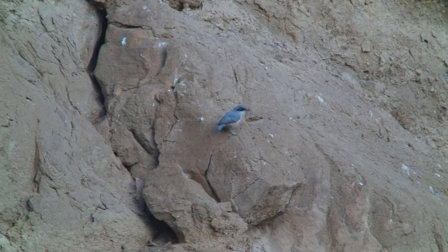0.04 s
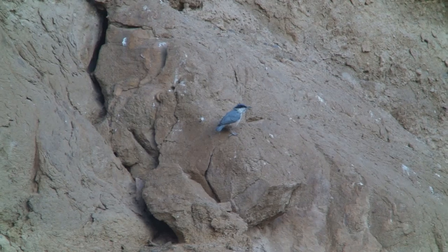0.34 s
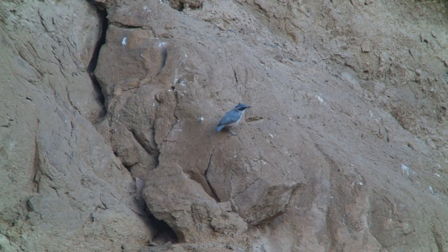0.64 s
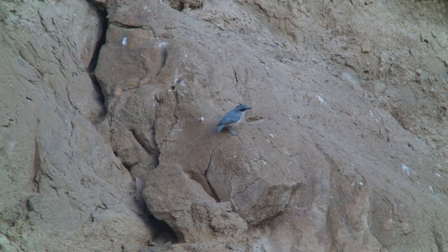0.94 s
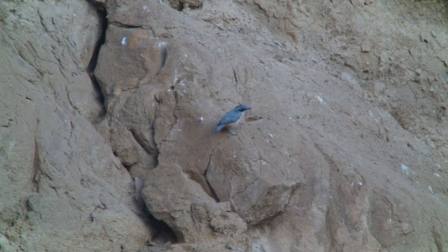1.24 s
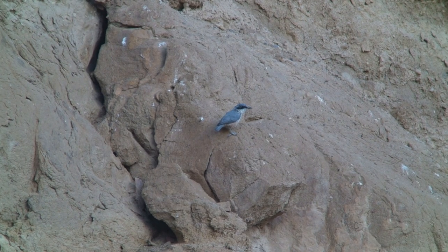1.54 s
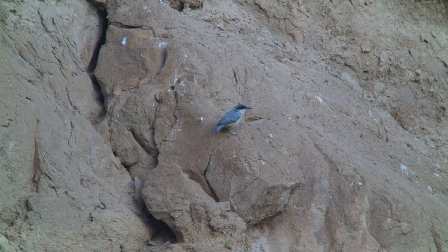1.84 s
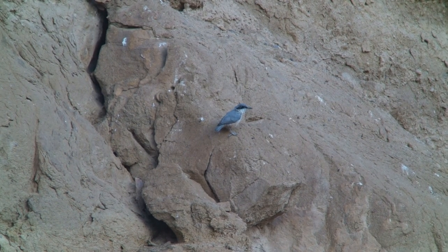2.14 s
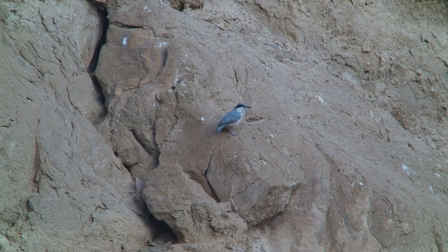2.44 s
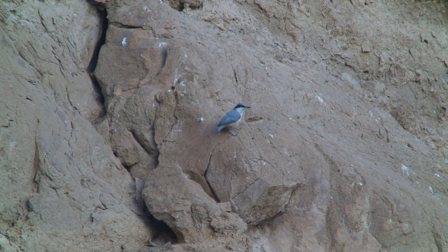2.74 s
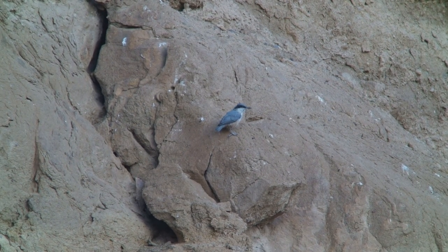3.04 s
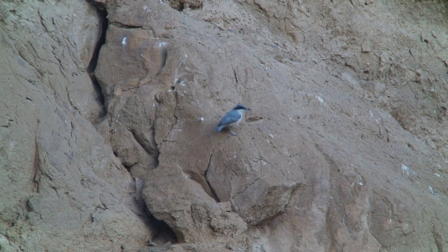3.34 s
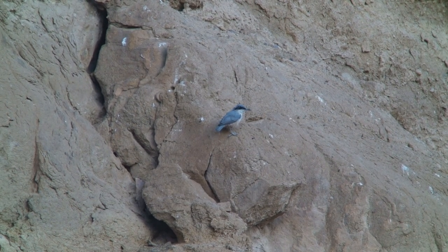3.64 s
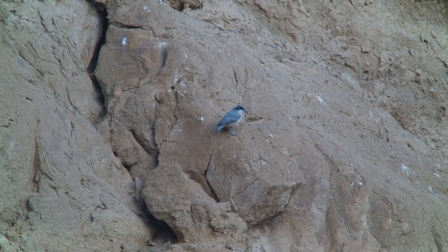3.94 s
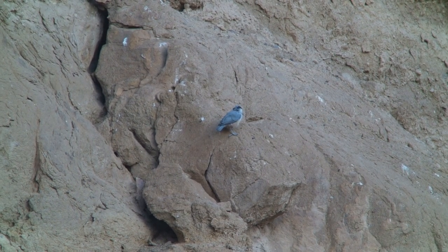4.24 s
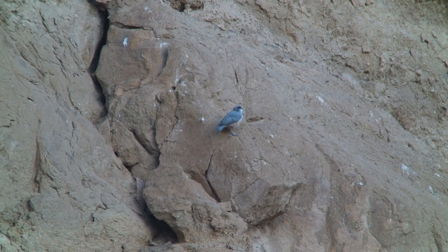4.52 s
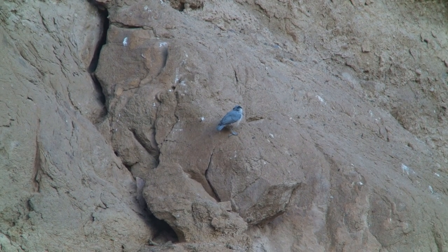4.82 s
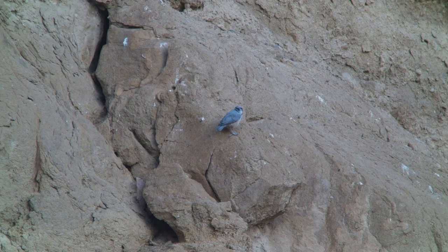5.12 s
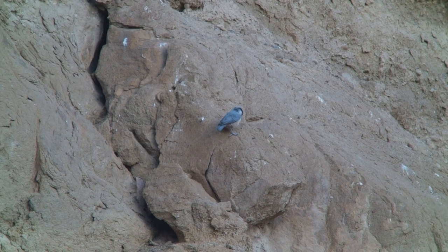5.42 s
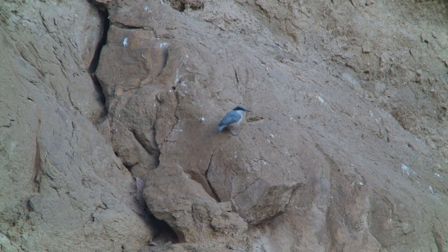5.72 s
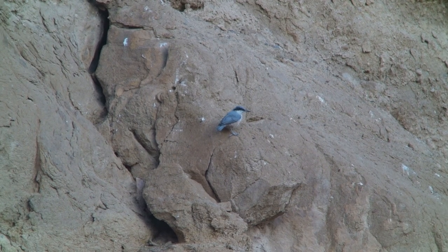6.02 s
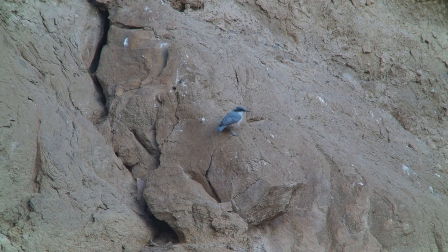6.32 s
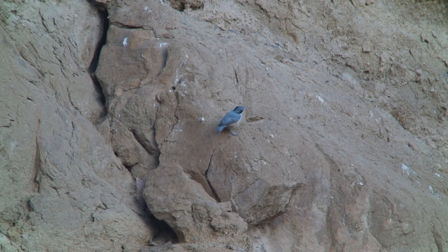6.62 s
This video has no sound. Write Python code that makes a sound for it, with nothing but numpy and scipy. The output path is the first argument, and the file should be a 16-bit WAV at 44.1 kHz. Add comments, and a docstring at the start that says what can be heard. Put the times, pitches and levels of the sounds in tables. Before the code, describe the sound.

Outdoors by a rock face, two small birds sing together: one repeats rising whistles that slow slightly, the other adds quicker, higher chirps, each with a short echo. The duet stops before halfway, and later a faint run of rising notes and one falling whistle come from farther off. Wind hits the microphone throughout with low rumbling puffs and soft thumps, over a quiet hush.

```python
"""Two nuthatches duet on a rock face: one sings chips and sliding whistles, the other quicker arches.
Each note is one pure, gliding tone from a bird's voice box, and the cliff scatters it back.
A fainter run of rising notes and one falling whistle follow from farther off.
Swirls of wind buffet the microphone in short puffs, over a quiet hush and a few small ticks."""
import sys
import numpy as np
from scipy import signal
from scipy.fft import rfft, irfft, next_fast_len
from scipy.io import wavfile
from scipy.ndimage import map_coordinates

SR = 44100
rng = np.random.default_rng(int(sys.argv[2]) if len(sys.argv) > 2 else 0)


def dump(signal):
    """Clip the signal to [-1, 1] and save it as 16-bit WAV at the path in sys.argv[1]."""
    limited = np.clip(np.atleast_2d(signal).T, -1, 1)
    pcm = np.round(limited * 32767).astype(np.int16)
    wavfile.write(sys.argv[1], SR, pcm)


N = 298557
T = np.arange(N) / SR

# how strongly the wind blows: (time [s], level [dB])
WIND_STRENGTH = [(.05, -56), (.5, -56), (.8, -49), (.98, -59), (1.13, -43.5), (1.29, -57), (1.55, -56),
                 (1.8, -46), (2.1, -59), (2.5, -53.5), (2.7, -42.5), (2.95, -60), (3.75, -47), (4.0, -51),
                 (4.85, -48.5), (5.5, -48.5), (5.8, -63), (6.05, -66), (6.6, -42), (6.77, -46.5)]
# how alike the wind sounds on the left and right: (frequency [Hz], likeness [0-1])
WIND_LIKENESS = [(30, 1), (85, 0.92), (170, 0.83), (340, 0.42), (650, 0)]


def amp(db):
    """Turn decibels into a number to multiply a sound by."""
    return 10 ** (np.asarray(db) / 20)


def unit(x):
    """Scale a sound to an average (rms) size of 1."""
    return x / np.sqrt(np.mean(x ** 2) + 1e-20)


def at(curve, s):
    """Read a table's other columns at time s."""
    times, *columns = np.transpose(curve)
    return [np.interp(s, times, column) for column in columns]


def along(points, hz):
    """Read a table at frequency hz, with octaves evenly spaced."""
    f, v = np.transpose(points)
    return np.interp(np.log(hz + 1), np.log(f + 1), v)


def wobble(rate, size):
    """A smooth curve through rate random points a second."""
    points = rng.standard_normal(int(size * rate / SR) + 4)
    return map_coordinates(points, [np.arange(size) * rate / SR], mode="nearest")


def filtered(x, response):
    """Multiply each frequency in a sound by response(hz)."""
    size = next_fast_len(N + SR // 2)
    return irfft(rfft(x, size) * response(np.fft.rfftfreq(size, 1 / SR)), size)[..., :N]


def rush(spectrum, likeness):
    """Stereo noise with a given tone colour and left-right likeness."""
    def response(hz):
        turn = np.arccos(np.clip(along(likeness, hz), -1, 1)) / 2
        return amp(along(spectrum, hz)) * [np.cos(turn), np.sin(turn)]
    mid, side = filtered(rng.standard_normal((2, N)), response)
    return unit(np.array([mid + side, mid - side]))


def steadied(x, size):
    """Even out the swells of a noise over size samples."""
    window = signal.windows.hann(size)
    power = signal.fftconvolve(np.mean(x ** 2, axis=0), window / window.sum(), "same")
    return unit(x / np.sqrt(np.abs(power) + 0.023))


def air():
    """A steady outdoor hush, and a distant rush that swells twice."""
    # tone colours of the two noises: (frequency [Hz], level [dB])
    hush_colour = [(20, 1), (60, 18), (150, 10.5), (300, 0), (500, -2.5), (1000, -10), (1500, -5.5),
                   (2400, -9), (3500, -9), (5000, -11.5), (6300, -10), (10000, -12), (15500, -14.5)]
    distant_colour = [(200, -10), (500, -1), (950, -14.5), (1300, -6), (1550, -5), (1750, -5),
                      (2000, -10.5), (4000, -24), (8000, -45)]
    # how alike left and right sound: (frequency [Hz], likeness [0-1])
    likeness = [(60, 1), (300, 0.38), (1500, 0), (4000, 0), (15000, 0)]
    # the distant rush comes and goes: (time [s], level [dB])
    distant_level = [(0, -62.5), (.25, -67), (.45, -73.5), (3.3, -94), (3.7, -73), (3.95, -69),
                     (4.2, -75.5), (6.7, -80)]
    distant_db, = at(distant_level, T)
    distant = amp(distant_db) * rush(distant_colour, likeness)
    return amp(-61) * rush(hush_colour, likeness) + distant


def ticks(pitch_spread=0.17):
    """Small dry ticks: tiny bursts of noise, each around its own pitch."""
    # the bursts: (time [s], level [dB], pitch [Hz], half width [s])
    bursts = [(.143, -67, 3100, .005), (0.285, -66, 3170, 0.0033), (.474, -69, 3300, 0.0036),
              (.69, -69, 3200, 0.019), (.78, -66, 3100, 0.0027), (1.911, -69.5, 5000, .004),
              (2.3441, -42.5, 7300, 0.00023), (2.4505, -60, 7000, .0004), (2.816, -68.5, 4900, .004),
              (3.786, -69, 5600, .0034), (5.663, -70.5, 5370, .007), (6.296, -68.5, 5400, .003)]
    out = np.zeros(N + SR)
    t = np.arange(-2048, 2048) / SR
    f = np.fft.rfftfreq(len(t), 1 / SR) + 1
    for s, db, hz, width in bursts:
        band = np.exp(-(np.log(f / hz) / pitch_spread) ** 2 / 2)
        noise = irfft(rfft(rng.standard_normal(len(t))) * band)
        swell = np.exp(-(t / width) ** 2 / 2)
        tick = unit(noise * swell) * np.sqrt(np.mean(swell ** 2))
        out[round((s + t[0]) * SR):][:len(t)] += amp(db) * tick
    return out[:N]


def breeze(average_db=-56, follows_wind=0.67, heave_db=4.0):
    """A deep, slowly heaving rumble that grows with the wind and sinks in the lulls."""
    # tone colour of the swaying air: (frequency [Hz], level [dB])
    sway_colour = [(15, -17.5), (30, -7), (55, 1.5), (100, 3), (160, -13), (300, -39), (600, -81)]
    wind_db, = at(WIND_STRENGTH, T)
    level_db = average_db + follows_wind * (wind_db - wind_db.mean())
    level_db += heave_db * wobble(4.9, size=N)
    return amp(level_db) * rush(sway_colour, WIND_LIKENESS)


def small_puffs(count=170, half_width_s=0.006, scatter_db=3):
    """List small swirls at random moments, sized by the wind's strength, as rows for wind_puffs."""
    shift, size = rng.standard_normal((count, 2)).T
    times = (np.arange(count) + shift / 2) * T[-1] / count
    wind_db, = at(WIND_STRENGTH, times)
    levels = wind_db + scatter_db * size
    return [(s, half_width_s, db + 2.5, db - 14) for s, db in zip(times, levels)]


def wind_puffs(flutter_narrowing=1.68):
    """Each swirl of air swells and dies at the microphone: a low rumble, a briefer, higher flutter."""
    # the strong puffs: (time [s], half width [s], rumble [dB], flutter [dB])
    strong_puffs = [(.053, 0.0069, -44, -67), (.201, 0.0097, -40, -54), (.334, 0.0076, -31.5, -43),
                    (.477, 0.023, -48.5, -75), (.616, 0.0029, -39.5, -68), (.66, 0.0084, -28, -40),
                    (.732, 0.021, -32, -42), (.837, .0059, -32.5, -65), (.9, 0.0057, -34.5, -59),
                    (1.069, 0.0081, -35.5, -52.5), (1.126, 0.0095, -29.5, -52), (1.164, 0.0031, -29.5, -52),
                    (1.214, 0.0066, -35.5, -38), (1.329, 0.0049, -34, -49), (1.466, 0.0057, -31.5, -47.5),
                    (1.502, 0.01, -39.5, -57), (1.622, 0.0086, -30.5, -37), (1.711, 0.017, -24.5, -32.5),
                    (1.751, 0.0064, -40, -24.5), (1.781, 0.014, -29, -36.5), (1.891, .016, -23.5, -26.5),
                    (1.973, 0.025, -32, -37.5), (2.178, 0.011, -42, -58.5), (2.322, 0.0094, -34, -41.5),
                    (2.373, 0.0042, -32.5, -41.5), (2.421, 0.013, -29.5, -42.5), (2.626, 0.005, -26, -36),
                    (2.693, 0.0053, -28, -33.5), (2.762, 0.023, -41, -47), (2.853, 0.012, -40.5, -54.5),
                    (2.966, 0.0051, -40.5, -51.5), (3.066, 0.012, -33.5, -50.5), (3.132, 0.012, -38.5, -60),
                    (3.308, 0.011, -28.5, -39), (3.46, 0.015, -29.5, -41), (3.581, .015, -42.5, -54.5),
                    (3.672, 0.016, -31.5, -45), (3.756, 0.013, -34.5, -45), (3.8, 0.0078, -32, -35),
                    (3.903, 0.012, -36, -45.5), (3.996, 0.0079, -42, -51), (4.088, 0.017, -37.5, -47),
                    (4.16, 0.007, -41, -29), (4.185, 0.017, -36, -37.5), (4.331, 0.013, -28.5, -29.5),
                    (4.372, .011, -29, -37), (4.417, 0.0096, -37.5, -47.5), (4.466, 0.0096, -55, -40.5),
                    (4.57, 0.0067, -26.5, -32), (4.626, 0.015, -41.5, -40.5), (4.737, 0.01, -48, -42),
                    (4.79, 0.012, -35.5, -36.5), (4.862, .025, -34, -42), (4.899, 0.0036, -29.5, -44),
                    (5.095, 0.012, -37, -41.5), (5.144, 0.0052, -29.5, -44.5), (5.206, 0.0093, -32, -37),
                    (5.254, 0.0059, -31.5, -36.5), (5.335, .022, -37, -47), (5.452, 0.0065, -29, -41.5),
                    (5.491, 0.0031, -29.5, -32.5), (5.521, 0.0043, -33, -58), (5.639, 0.0072, -27, -34.5),
                    (5.676, 0.0062, -28, -30), (5.712, 0.0074, -39.5, -49.5), (6.055, 0.0077, -32, -61),
                    (6.387, 0.0093, -36.5, -50), (6.532, 0.014, -30.5, -44.5), (6.63, 0.026, -34, -37)]
    # tone colours of a puff's two parts: (frequency [Hz], level [dB])
    rumble_colour = [(10, -35), (25, -25), (40, -12), (62, -2), (130, 4), (200, 1), (260, -11), (350, -45),
                     (600, -74)]
    flutter_colour = [(120, -47), (200, -11.5), (250, 3), (330, -1), (420, -11.5), (520, -22.5), (700, -34),
                      (1000, -49.5), (2000, -80)]
    rumble_power, flutter_power = np.zeros(N), np.zeros(N)
    for s, width, rumble_db, flutter_db in list(strong_puffs) + small_puffs():
        near = slice(*np.searchsorted(T, [s - .25, s + .25]))
        swell = np.exp(2 - 2 * np.hypot(1, (T[near] - s) / width))
        rumble_power[near] += amp(rumble_db) ** 2 * swell
        flutter_power[near] += amp(flutter_db) ** 2 * swell ** flutter_narrowing
    rumble = np.sqrt(rumble_power) * steadied(rush(rumble_colour, WIND_LIKENESS), size=1300)
    flutter = np.sqrt(flutter_power) * steadied(rush(flutter_colour, WIND_LIKENESS), size=1100)
    return rumble + flutter


def wind_thumps(offset_rad=0.53, low_cut=2.14, high_cut=1.165):
    """A sharp swirl hits the microphone with a pressure swing or two, out of step left and right."""
    # the sharpest swirls: (time [s], level [dB], pitch [Hz])
    hits = [(.656, -20.5, 153), (1.126, -19.5, 96), (1.631, -22.5, 193), (1.751, -22.5, 350),
            (1.729, -21, 196), (1.762, -22.5, 245), (1.841, -20.5, 210), (1.884, -20.5, 272),
            (1.894, -12.5, 240), (1.993, -20.5, 163), (2.693, -22, 90), (2.763, -15.5, 225),
            (3.47, -20, 158), (3.793, -18.5, 159), (4.085, -15, 168), (4.159, -13.5, 242),
            (4.174, -16, 236), (4.193, -21, 260), (4.304, -17.5, 155), (4.331, -13, 192),
            (4.571, -12.5, 164), (4.792, -20.5, 218), (5.197, -20.5, 190), (5.487, -24, 232)]
    size = 4096
    out = np.zeros((2, N + size))
    f = np.fft.rfftfreq(size, 1 / SR)
    for (s, db, hz), (phase, lean) in zip(hits, rng.uniform(-1.24, 1, (len(hits), 2))):
        colour = (f / hz) ** low_cut * np.exp(-high_cut * (f / hz) ** 2)
        offset = offset_rad * np.sign(lean) * np.array([[1], [-1]]) * np.minimum(f / 300, 2)
        spectrum = colour * np.exp(1j * (np.pi * phase + offset))
        swing = np.fft.fftshift(irfft(spectrum), axes=1) * size / 2 / colour.sum()
        out[:, round(s * SR) - size // 2:][:, :size] += amp(db - 0.3) * swing
    return out[:, :N]


def cliff_echo(song, likeness):
    """Rough rock scatters the song back; the echo changes as a bird turns its head."""
    # a fading echo with two stronger returns: (delay [s], level [dB])
    echo_shape = [(.003, 0.5), (.012, -4), (.03, -11.5), (.045, -2.5), (.062, -5), (.085, -7), (.102, -9),
                  (.2, -20), (.4, -51)]
    tail_db, = at(echo_shape, np.arange(SR // 2) / SR)
    echo = np.zeros((2, N))
    for s in np.arange(0, T[-1] + .5, .5):  # blend into a new random echo every half second
        blend = np.sqrt(np.clip(1 - 2 * np.abs(T - s), 0, 1))
        tails = rng.standard_normal((2, len(tail_db))) * amp(tail_db)
        tails /= np.linalg.norm(tails, axis=1, keepdims=True)
        echo += signal.oaconvolve((blend * song)[None], tails, axes=1)[:, :N]
    turn = np.arccos(np.clip(likeness, 0, 1)) / 2
    mid, side = np.cos(turn) * echo[0], np.sin(turn) * echo[1]
    return np.array([mid + side, mid - side])


def add_note(track, s, length, shape, waver=0.0041, flutter_db=0.5, fade_s=0.0015):
    """Add one pure bird note; shape rows are (position [note lengths], pitch [Hz], level [dB])."""
    t = np.arange(int(length * SR)) / SR
    hz, db = at(shape, t / length)
    drift, shake = (wobble(400, size=SR // 4)[:len(t)] for _ in range(2))
    pitch = hz * (1 + waver * drift)
    fade = np.clip(t / fade_s, 0, 1) * np.clip((length - t) / fade_s, 0, 1)
    level = amp(db + flutter_db * shake)
    track[round(s * SR):][:len(t)] += fade * level * np.sin(2 * np.pi * np.cumsum(pitch) / SR)


def arch(hz, db):
    """The shape of a note that climbs, turns over and fades."""
    return [(0, .755 * hz, db - 14), (.25, .9 * hz, db), (.45, .98 * hz, db),
            (.62, hz, db), (.8, .96 * hz, db - 5.5), (1, .695 * hz, db - 11)]


def note_times(start_s, gap_s, slowing_s, count):
    """Start times of a run of notes, each gap slowing_s longer than the last."""
    k = np.arange(count)
    return start_s + gap_s * k + slowing_s * k * (k - 1) / 2


def far_song(rise_hz=2183):
    """Faint birdsong: a run of rising notes, a few arches, a falling whistle and a thin call."""
    # the rising run swells and fades: (time [s], level [dB])
    run_level = [(4.39, -73), (4.7, -67), (5.14, -62.5), (5.6, -63.5), (5.91, -66)]
    # a whistle that falls, and a call that holds and then lifts: (time [s], pitch [Hz], level [dB])
    falling_whistle = [(6.005, 3590, -74), (6.035, 3470, -63), (6.07, 3330, -55.5), (6.083, 3250, -71),
                       (6.1, 3140, -78)]
    thin_call = [(2.098, 3430, -81), (2.122, 3500, -69), (2.14, 3580, -72), (2.153, 3820, -66),
                 (2.168, 3670, -73)]
    song = np.zeros(N)
    for s in note_times(start_s=4.389, gap_s=.106, slowing_s=.0004, count=15):
        db, = at(run_level, s)
        rise = [(0, .87 * rise_hz, db - 4), (.4, rise_hz, db),
                (.7, 1.17 * rise_hz, db + 1), (1, 1.5 * rise_hz, db - 17)]
        add_note(song, s, length=.032, shape=rise, waver=0.03, flutter_db=3.5)
    for s in note_times(start_s=5.877, gap_s=.1, slowing_s=.012, count=4):
        add_note(song, s, length=.0273, shape=arch(hz=3050, db=-71))
    for call in (falling_whistle, thin_call):
        start, length = call[0][0], call[-1][0] - call[0][0]
        add_note(song, start, length, [((s - start) / length, hz, db) for s, hz, db in call])
    return song


def second_nuthatch():
    """The partner sings higher, arched notes, about twice as often as the first bird's slides."""
    # the arched notes: (time [s], level [dB])
    arch_notes = [(.675, -57.5), (.781, -47.5), (.885, -53.5), (.983, -52), (1.103, -54.5), (1.215, -51),
                  (1.336, -50.5), (1.446, -50), (1.5462, -53.5), (1.656, -53.5), (1.771, -54), (1.888, -57),
                  (2.0021, -48), (2.126, -53), (2.241, -51), (2.371, -49.5), (2.4947, -52), (2.632, -53),
                  (2.7633, -51.5), (2.8994, -52), (3.037, -52)]
    # later arches are longer and fuller: (time [s], length [s], top pitch [Hz], share sung [0-1])
    arch_changes = [(.675, 0.017, 2686, .55), (.9, 0.0167, 2926, 0.57), (1.22, 0.017, 2990, 0.52),
                    (1.7, 0.028, 2773, 0.875), (2.4, 0.033, 2904, 0.96), (3.04, .042, 2823, .93)]
    song = np.zeros(N)
    for s, db in arch_notes:
        length, top_hz, sung = at(arch_changes, s)
        partial_arch = [(share / sung, hz, level) for share, hz, level in arch(top_hz, db)]
        add_note(song, s, length, partial_arch, waver=0.014, flutter_db=0.8)
    return song


def first_nuthatch(chip_lead_s=.0765, chip_from_hz=1598, chip_to_hz=2658):
    """One bird sings a slowing run of sliding whistles, each led by a quick upward chip."""
    # each slide holds, bends and flicks upward; later ones are longer and lower:
    # (time [s], length [s], held pitch [Hz], bend pitch [Hz], held level [dB], flick level [dB])
    slides = [(.47, 0.049, 2110, 2460, -56, -47), (.92, 0.061, 2070, 2400, -51.5, -41.5),
              (1.144, .059, 2030, 2377, -50, -41), (1.372, .069, 1997, 2088, -50.5, -46),
              (1.836, .07, 1890, 2057, -51.5, -47), (2.557, .072, 1875, 2040, -54.5, -49.5)]
    # the chips swell and ease: (time [s], level [dB])
    chip_level = [(.395, -61), (.62, -55), (1.07, -49.5), (2.48, -51)]
    song = np.zeros(N)
    for s in note_times(start_s=.4695, gap_s=.2228, slowing_s=.0021, count=10):
        length, held_hz, bend_hz, db, flick_db = at(slides, s)
        slide = [(0, .83 * held_hz, db - 8), (.16, 1.03 * held_hz, db + 0.5),
                 (.45, held_hz + 0.29 * (bend_hz - held_hz), db - 0.5),
                 (.72, bend_hz, (db + flick_db) / 2 - 4.5),
                 (.89, 2498, flick_db), (1, 2670, flick_db - 1.5)]
        add_note(song, s, length, slide, waver=0.0097, flutter_db=2)
        chip_db, = at(chip_level, s - chip_lead_s)
        chip = [(0, chip_from_hz, chip_db - 4), (.5, np.sqrt(chip_from_hz * chip_to_hz), chip_db - 5),
                (1, chip_to_hz, chip_db + 1.5)]
        add_note(song, s - chip_lead_s, length=.017, shape=chip, waver=0.017)
    return song


def scene():
    """Mix the birds and their echoes with the air, the wind and the ticks."""
    # the nearest rock boosts some pitches and weakens others: (frequency [Hz], gain [dB])
    rock_colour = [(1600, -5.5), (1900, 4.5), (2050, -0.5), (2170, -6.5), (2300, 3.5), (2400, -1),
                   (2520, 5.5), (2680, -2.5), (2820, 1), (3050, -5.5)]
    # tone colour of the cliff's echo: (frequency [Hz], gain [dB])
    echo_colour = [(1600, -0.5), (1900, -2.5), (2150, 3), (2330, 1), (2520, -3.5), (2850, 0), (3100, -4)]
    duet, far = first_nuthatch() + second_nuthatch(), far_song()
    direct = filtered(duet, lambda hz: amp(along(rock_colour, hz)))
    duet_echo = filtered(cliff_echo(duet, likeness=0.67), lambda hz: amp(along(echo_colour, hz)))
    # the far song's echo takes a longer way, so it comes later
    far_echo = np.roll(cliff_echo(far, likeness=0.17), round(.025 * SR), axis=1)
    birds = direct + amp(-4.5) * duet_echo + amp(-1.5) * far + amp(-3.5) * far_echo
    lean_right = amp([[-.4], [.4]])
    return (birds + air()) * lean_right + wind_puffs() + breeze() + wind_thumps() + ticks()


def record(dry):
    """The sound fades in quickly after a moment of silence, and the very highest treble is cut."""
    start_s, top_hz = .038, 15750
    fade_in = np.clip((T - start_s) * 200, 0, 1)
    return filtered(dry * fade_in, lambda hz: hz < top_hz)


dry = scene()
out = record(dry)
dump(out)
```